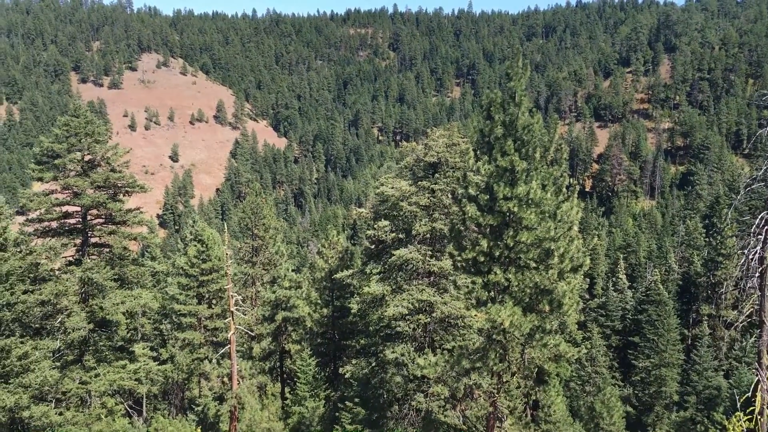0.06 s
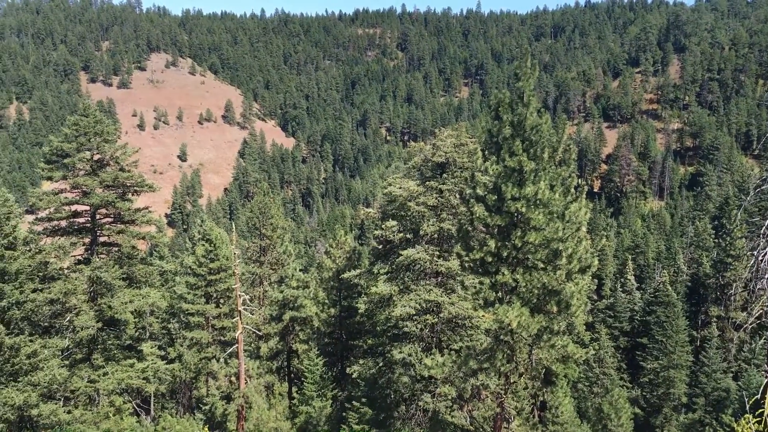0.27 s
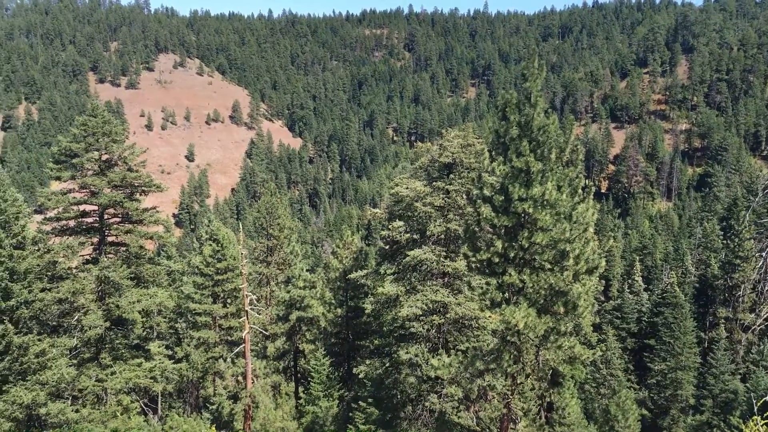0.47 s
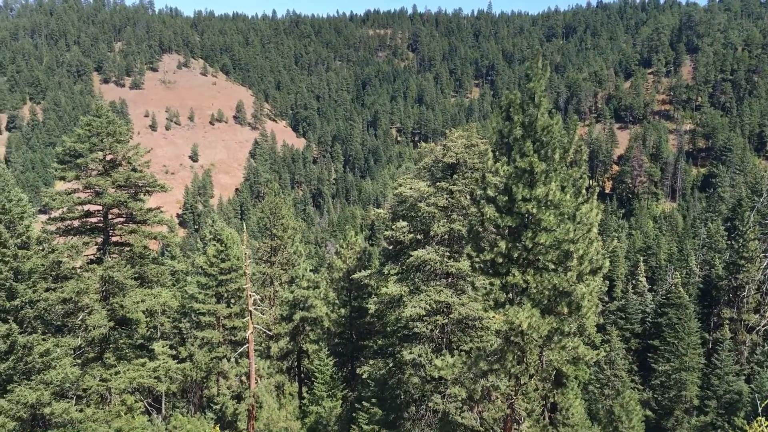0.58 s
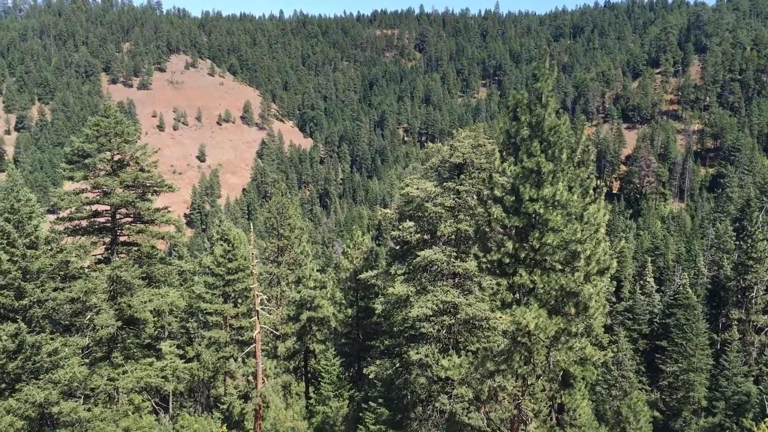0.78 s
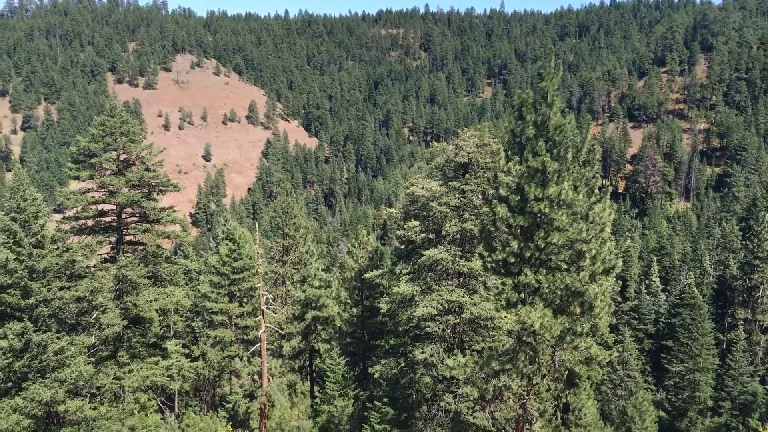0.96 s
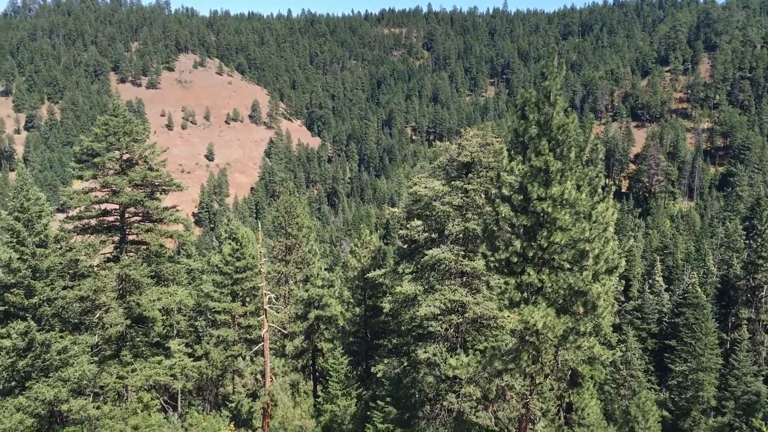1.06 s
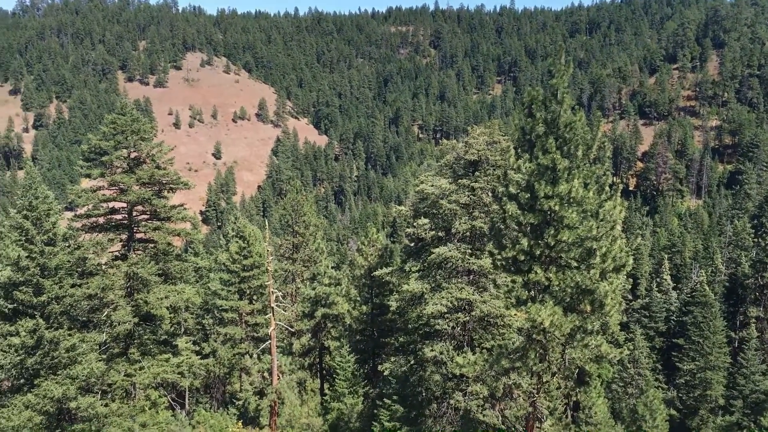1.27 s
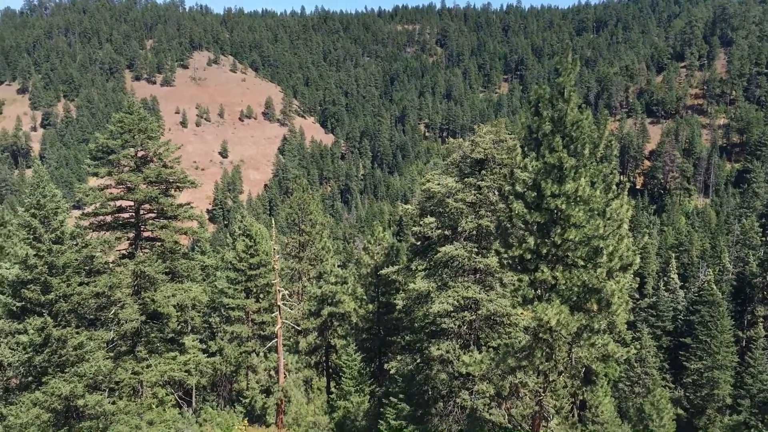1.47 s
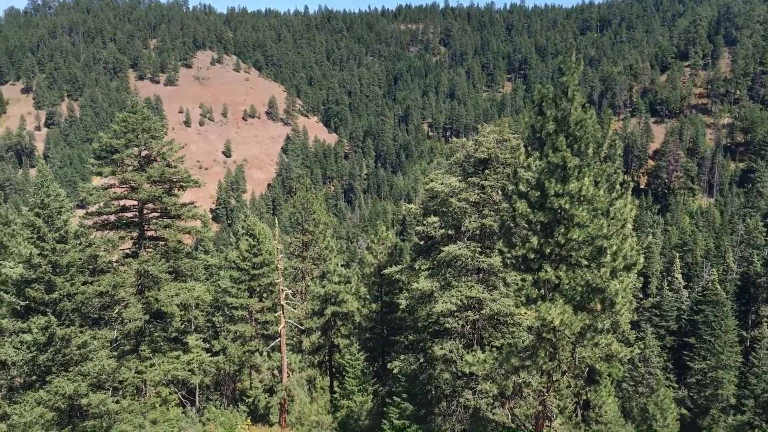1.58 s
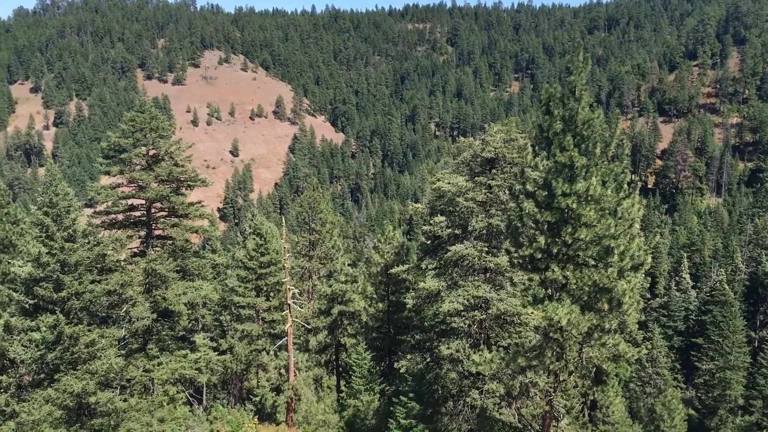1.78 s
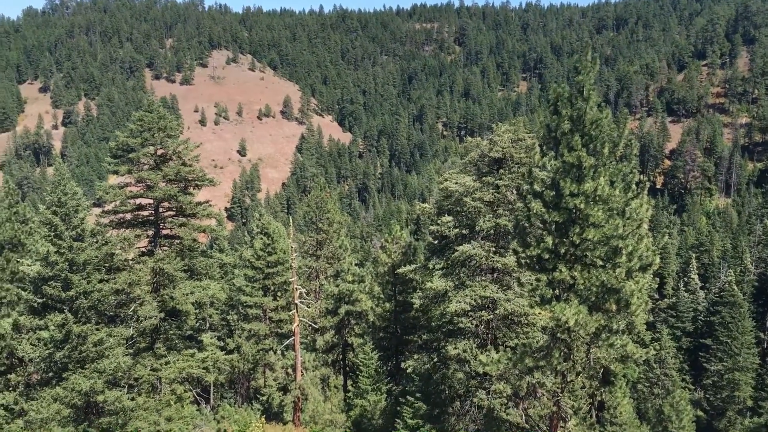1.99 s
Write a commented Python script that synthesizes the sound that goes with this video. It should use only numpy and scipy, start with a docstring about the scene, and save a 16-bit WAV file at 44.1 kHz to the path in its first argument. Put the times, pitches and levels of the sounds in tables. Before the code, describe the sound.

A grasshopper crackles in flight, a rapid, even train of sharp wing clicks that swells and then eases slightly. Light wind buffets the microphone with low thumps, over a faint hiss of forest trees.

```python
"""Grasshopper over a forest slope

A grasshopper crackles in flight, its wings snapping about 19 times a second.
Each snap is a pair of tiny cracks, one from each wing. Light wind buffets the microphone;
behind it lie a faint hiss of distant trees, a few soft rustles and one small tick."""
import sys
import numpy as np
from scipy import signal
from scipy.fft import rfft, irfft
from scipy.io import wavfile
from scipy.ndimage import uniform_filter1d

SR = 44100
rng = np.random.default_rng(int(sys.argv[2]) if len(sys.argv) > 2 else 0)


def inscribe(sig):
    """Save sig as 16-bit PCM at rate SR to the path in sys.argv[1].

    A 1-D sig is mono; a 2-D sig holds one channel per row.
    Samples are clipped to [-1, 1] before scaling.
    """
    pcm = np.round(np.clip(np.atleast_2d(sig).T, -1, 1) * 32767)
    wavfile.write(sys.argv[1], SR, pcm.astype(np.int16))


N = 90404


def undb(db):
    """Decibels to gain."""
    return 10 ** (np.asarray(db) / 20)


def colour_db(points, hz):
    """Read an EQ curve, in dB, at the given frequencies."""
    point_hz, point_db = np.array(points).T
    return np.interp(np.log(hz + 1), np.log(point_hz), point_db)


def bell(hz, centre_hz, octaves):
    """Bell curve on an octave scale, 1 at its centre."""
    return np.exp(-.5 * (np.log2((hz + 1) / centre_hz) / octaves) ** 2)


def noise(gain):
    """Unit-level noise, shaped by a gain that depends on frequency."""
    x = irfft(rfft(rng.standard_normal(N)) * gain(np.fft.rfftfreq(N, 1 / SR)), N)
    return x / x.std()


def tail(decay_s, size):
    """Fading random scatter of unit energy."""
    x = rng.standard_normal(size) * np.exp(-np.arange(size) / SR / decay_s)
    return x / np.linalg.norm(x)


def crack(db, size):
    """Spectrum of the most abrupt (minimum-phase) pulse with the given colour."""
    cepstrum = irfft(np.log(undb(db)))
    return np.exp(rfft(np.r_[cepstrum[0], 2 * cepstrum[1:size // 2]], size))


# The bright colour of one wing's crack: freq_hz, gain_db
WING_COLOUR = [(500,-32),(1500,-14),(2500,-4),(3400,-2.5),(4200,-1),(5600,0),(7000,-1.5),(8500,-5.5),(11000,-9),(16000,-14.5)]
# Wing snaps, swelling then easing off: start_s, relative_level_db, second_wing_lag_ms, ring_hz
WING_SNAPS = [(.5030,-49,.45,4400),(0.5575,-43,.57,6540),(0.6125,-40,.69,6500),(0.667,-38.5,0.74,4600),(.7224,-37,0.49,5600),(.7785,-38,0.48,5870),(.8334,-36.5,.48,5500),
              (0.8868,-34,0.55,5850),(.9398,-33,0.42,6300),(.9939,-33.5,0.596,5800),(1.0484,-35.5,0.26,4500),(1.1029,-35,0.81,4400),(1.1568,-36,0.24,4440),(1.2106,-36,0.32,4000),(1.2631,-36,0.32,7160),
              (1.3146,-38,0.37,6700),(1.3678,-38,0.38,5150),(1.4202,-37.5,0.34,5160),(1.4729,-38.5,0.39,5550),(1.5251,-39.5,0.21,5900),(1.5786,-40.5,0.84,5770),(1.6309,-39,.65,5600),(1.6819,-36.5,0.37,5540),
              (1.7336,-42,0.43,5260),(1.7838,-40.5,0.37,5400),(1.8357,-41.5,0.46,4630),(1.8865,-42.5,.43,4860),(1.9384,-43,0.29,3970),(1.9899,-38.5,.53,4000),(2.0403,-38.5,0.82,3900)]

def grasshopper(size=512):
    """Two wing membranes crack under a millisecond apart and ring; foliage scatters a little back."""
    snap_gain_db, second_wing_db, colour_jitter_db, ring_db = 2.5, -5.5, 1.5, 7
    shiver_db, foliage_db = -12, -24
    snaps = np.zeros(N + size)
    hz = np.fft.rfftfreq(size, 1 / SR)
    for start_s, level_db, lag_ms, ring_hz in WING_SNAPS:
        colour = [(f, db + colour_jitter_db * rng.standard_normal()) for f, db in WING_COLOUR]
        ring = ring_db * bell(hz, ring_hz, octaves=.18)
        one_wing = crack(colour_db(colour, hz) + ring, size)
        wing_pair = 1 + undb(second_wing_db) * np.exp(-2j * np.pi * hz * lag_ms / 1000)
        shiver = undb(shiver_db) * rfft(tail(decay_s=.0006, size=size))
        snap = irfft(one_wing * (wing_pair + shiver))
        i = min(int(start_s * SR), N)
        snaps[i:i + size] += undb(level_db + snap_gain_db) * snap / np.linalg.norm(snap)
    scatter = signal.fftconvolve(snaps, tail(decay_s=.035, size=N // 2))
    return snaps[:N] + undb(foliage_db) * scatter[:N]


# The deep colour of wind on the microphone: freq_hz, gain_db
RUMBLE_COLOUR = [(15,-35),(28,-13),(45,0),(64,1),(90,-8),(130,-15),(200,-22),(320,-34),(500,-48),(900,-66),(4000,-100)]
# The rise and fall of the breeze: time_s, level_db
BREEZE = [(0,-50),(.06,-51),(.12,-47),(.2,-51),
          (.27,-41),(.32,-49),(.36,-42),(.39,-47),(.43,-41),(.47,-46),(.50,-41),(.54,-52),(.67,-55),(.71,-43),(.77,-50),(.80,-39),(.845,-46),(.885,-33),(.93,-38),(.97,-33),(1.005,-50),(1.06,-40),(1.12,-45),
          (1.3,-41),(1.37,-46),(1.41,-52),(1.51,-55),(1.55,-44),(1.69,-52),(1.8,-50),(1.84,-60),(1.93,-56),(1.98,-66),(2.05,-64)]
# Soft thumps of single eddies: centre_s, peak_db, pitch_hz
EDDY_THUMPS = [(0.221,-34.5,179),(0.257,-28,115.7),(.353,-35,102),(0.438,-40.5,223),(.483,-46.5,169),(0.496,-36.5,92),(.730,-41,120),(0.81,-35.5,227),(0.816,-27.5,124),(0.864,-28,184),(0.879,-21,74.3),(0.911,-28.5,159),
               (0.962,-24,91),(.968,-31.5,345),(1.032,-49,226),(1.055,-33,94),(1.090,-48,157),(1.236,-39,75.4),(1.293,-33,140),(1.344,-35,194),(1.527,-47,182),(1.541,-35,79),(1.598,-36,119),(1.625,-46,216),(1.713,-46,340),(1.735,-28.5,89),(1.791,-31,63)]

def wind(t):
    """Rumble follows the breeze; each eddy hits the microphone with one brief swing of pressure."""
    rumble = noise(lambda f: undb(colour_db(RUMBLE_COLOUR, f)))
    power = uniform_filter1d(uniform_filter1d(rumble ** 2, size=1500), size=1000)
    steady_rumble = rumble / np.sqrt(power)  # evened out so the breeze sets the level
    out = steady_rumble * undb(np.interp(t, *np.array(BREEZE).T))
    width_cycles = .47
    for centre_s, peak_db, pitch_hz in EDDY_THUMPS:
        cycles = (t - centre_s) * pitch_hz
        swell = 1 / np.cosh(np.clip(2 * cycles / width_cycles, -20, 20) * np.log(2))
        out += undb(peak_db) * swell * np.sin(2 * np.pi * (cycles + rng.random()))
    return out


# The colour of distant trees: freq_hz, gain_db
HISS_COLOUR = [(40,0),(150,20),(300,16.5),(500,9),(900,5),(1700,1.5),(3000,0),(5000,-1),(9000,-4.5),(11000,-8),(16000,-8)]
# Short, soft rustles: centre_s, level_db, half_length_s, centre_hz
SOFT_RUSTLES = [(.085,-76,0.017,5000),(0.885,-68,0.0056,990),(1.292,-69,0.01,4250),(1.395,-78,0.011,2670),(1.776,-73.5,0.018,4560)]

def forest(t):
    """An even bed of hiss from distant trees, dotted with soft rustles and one small dry tick."""
    hiss_db = -69.5
    tick_s, tick_db, tick_decay_s = 1.095, -62, .006
    bed = undb(hiss_db) * noise(lambda f: undb(colour_db(HISS_COLOUR, f)))
    for centre_s, level_db, half_length_s, centre_hz in SOFT_RUSTLES:
        swell = np.exp(-((t - centre_s) / half_length_s) ** 2)
        bed += undb(level_db) * swell * noise(lambda f: bell(f, centre_hz, octaves=.27))
    tick_fade = (t >= tick_s) * np.exp(-abs(t - tick_s) / tick_decay_s)
    tick = tick_fade * noise(lambda f: bell(f, centre_hz=2100, octaves=.9))
    return bed + undb(tick_db) * tick


def scene():
    """Grasshopper, wind and forest, mixed to mono."""
    t = np.arange(N) / SR
    return (grasshopper() + wind(t) + forest(t))[None]


def record(dry):
    """A steep low-pass trims the very top of the treble."""
    cutoff_hz = 15900
    return signal.sosfilt(signal.ellip(8, .2, 70, cutoff_hz, fs=SR, output="sos"), dry)


dry = scene()
out = record(dry)
inscribe(out)
```